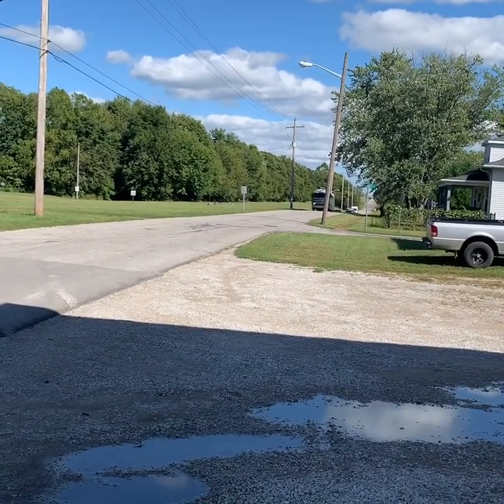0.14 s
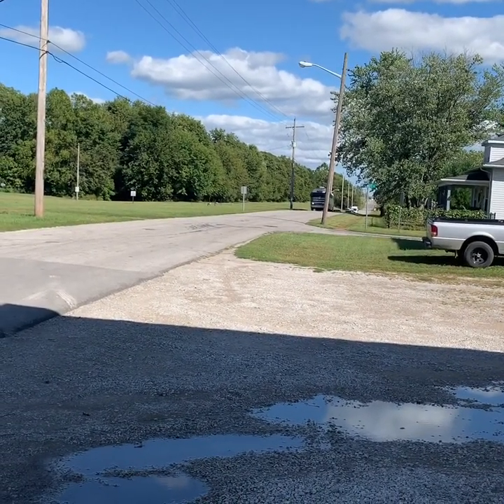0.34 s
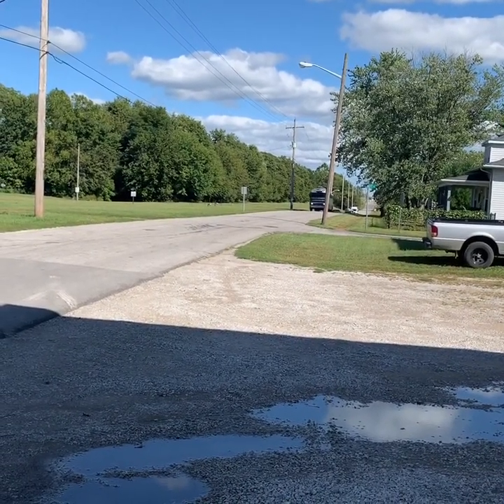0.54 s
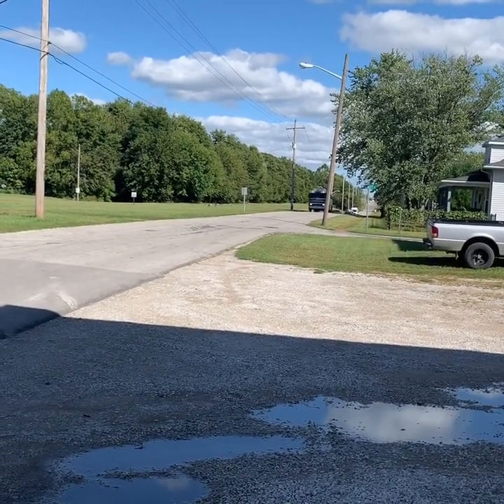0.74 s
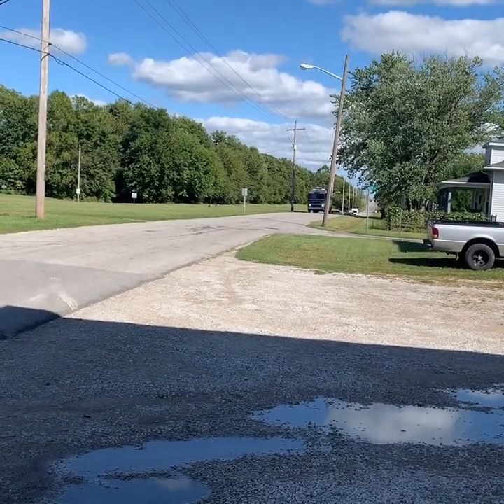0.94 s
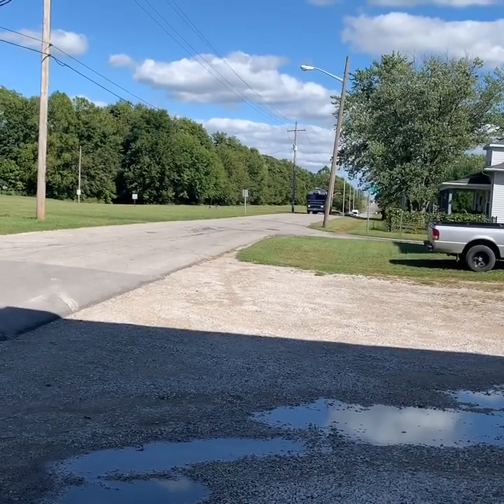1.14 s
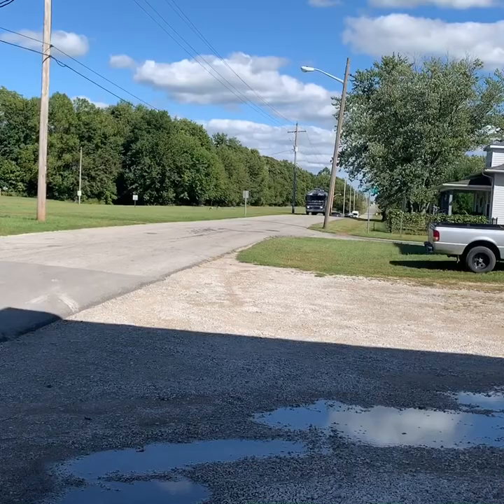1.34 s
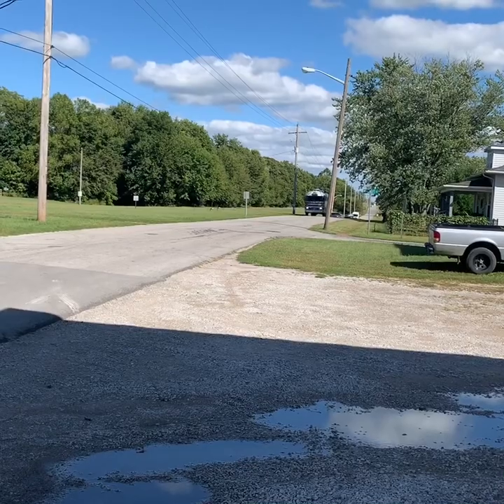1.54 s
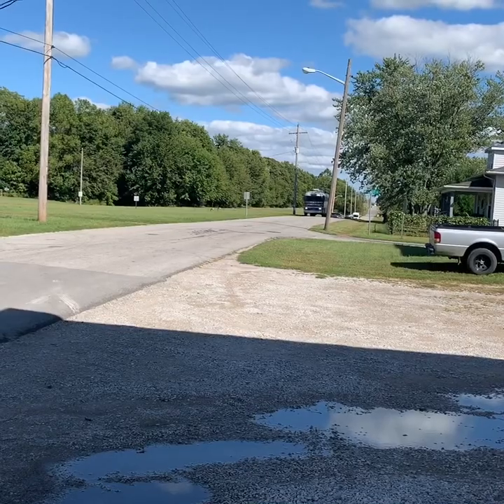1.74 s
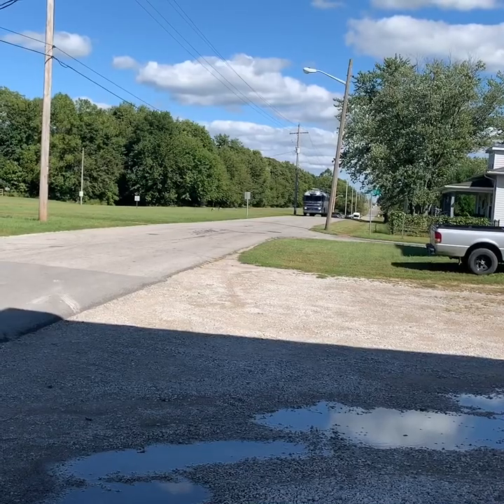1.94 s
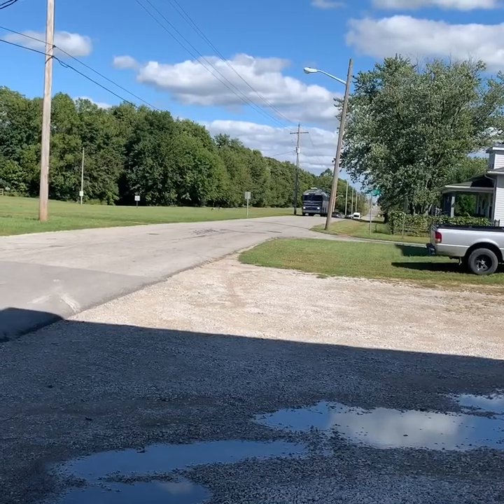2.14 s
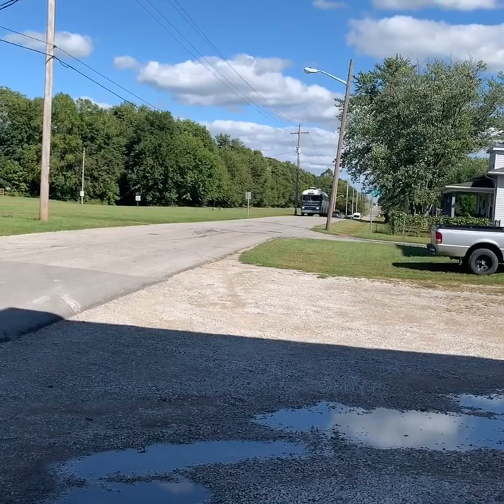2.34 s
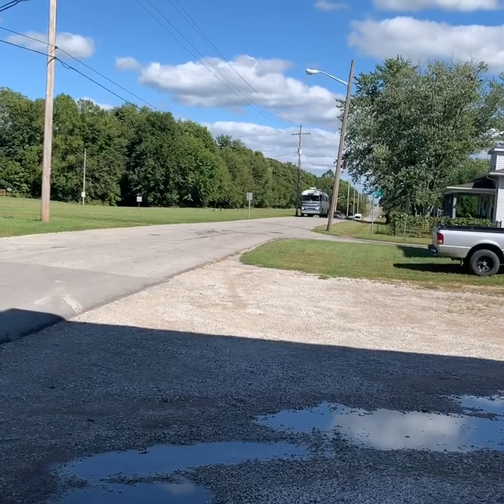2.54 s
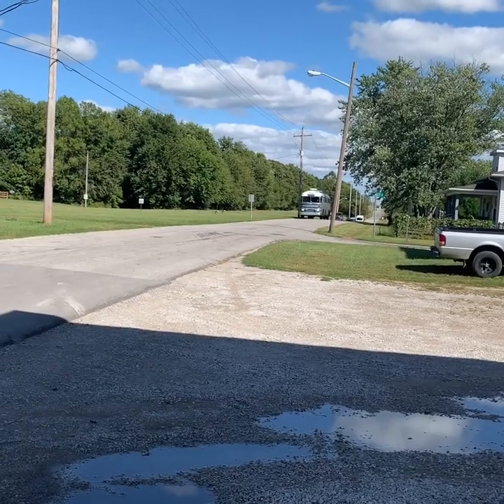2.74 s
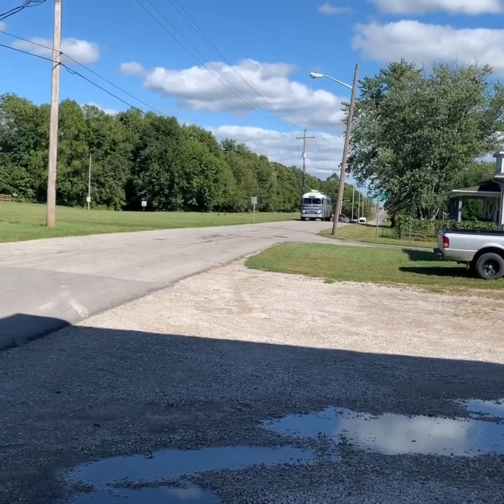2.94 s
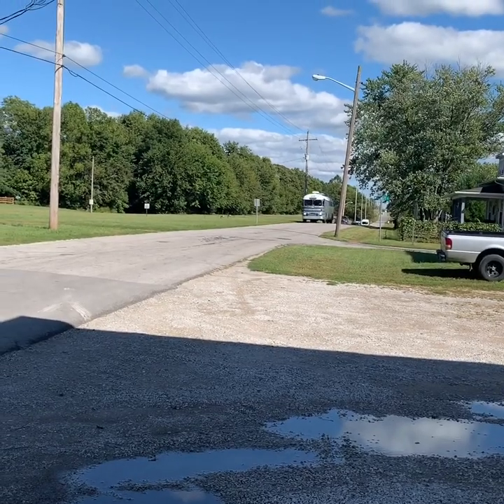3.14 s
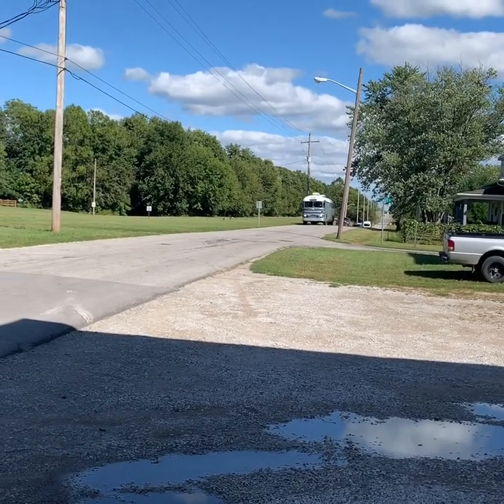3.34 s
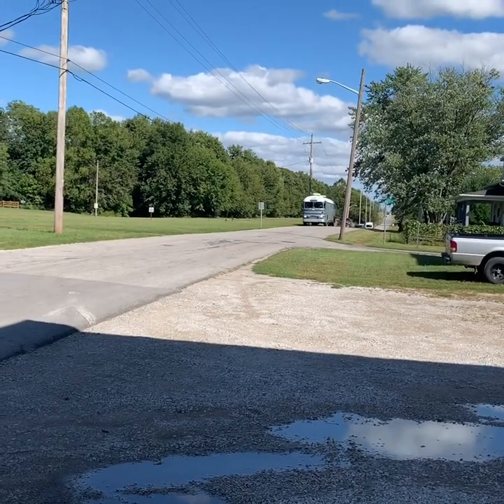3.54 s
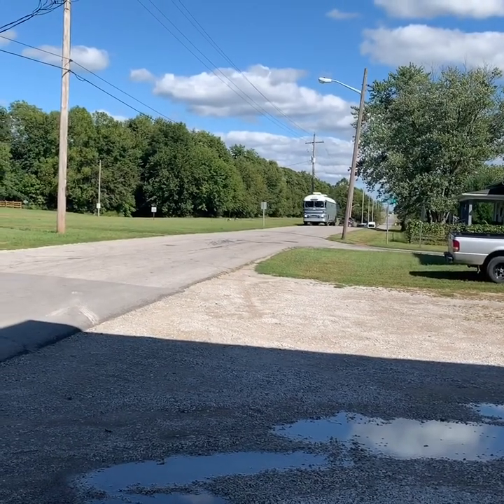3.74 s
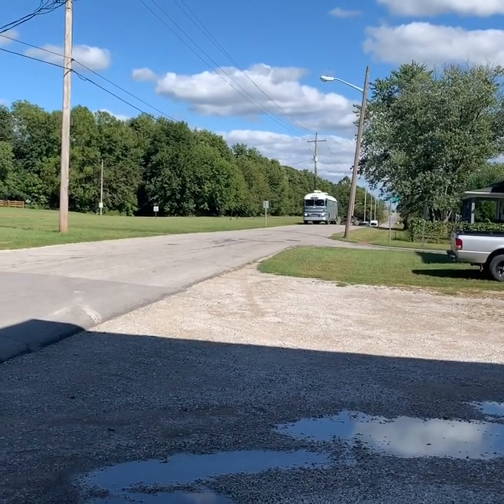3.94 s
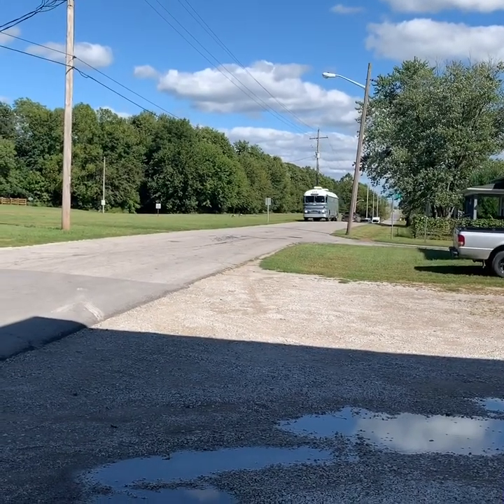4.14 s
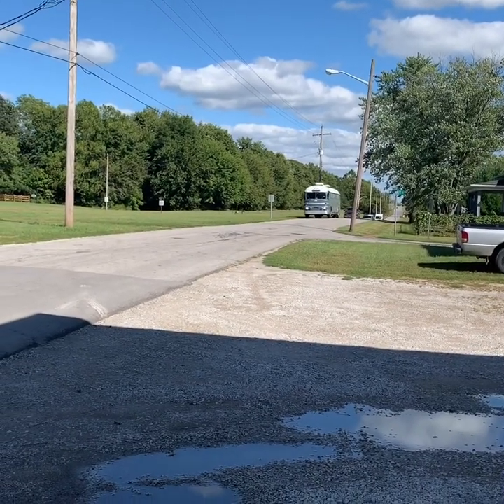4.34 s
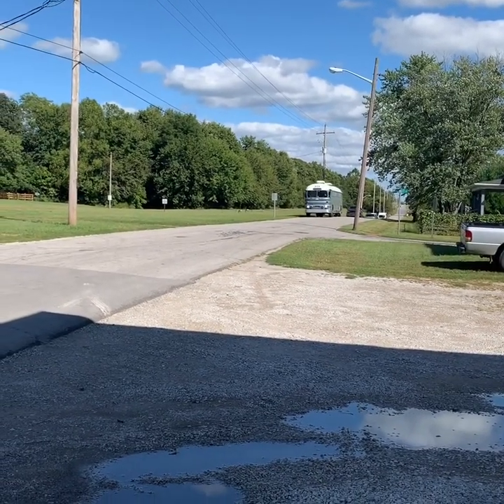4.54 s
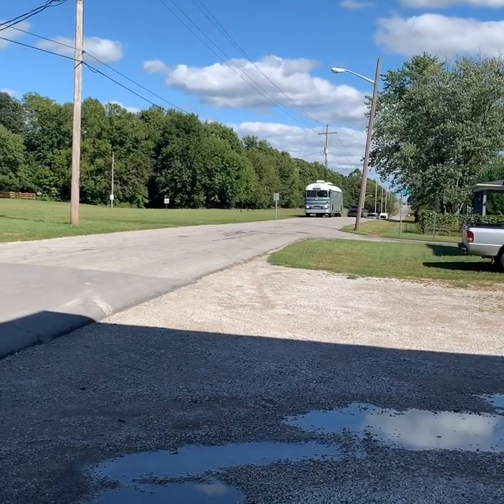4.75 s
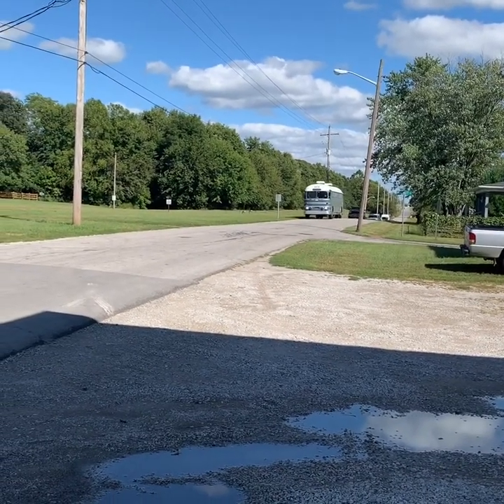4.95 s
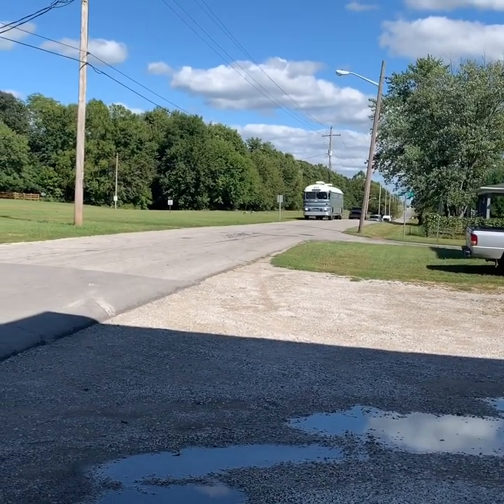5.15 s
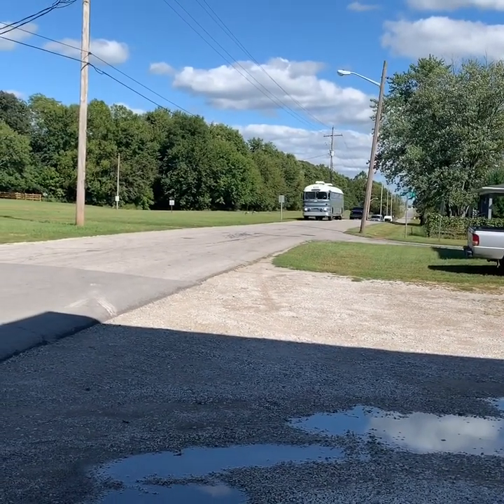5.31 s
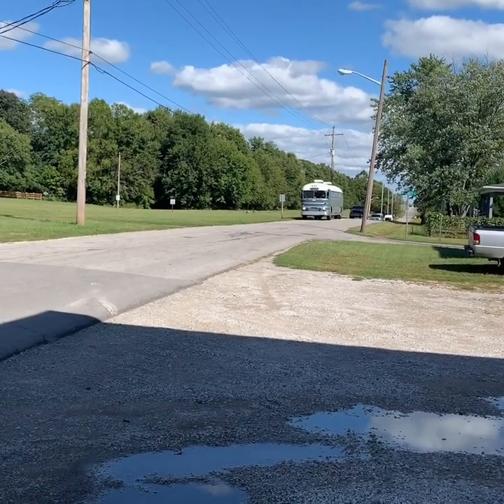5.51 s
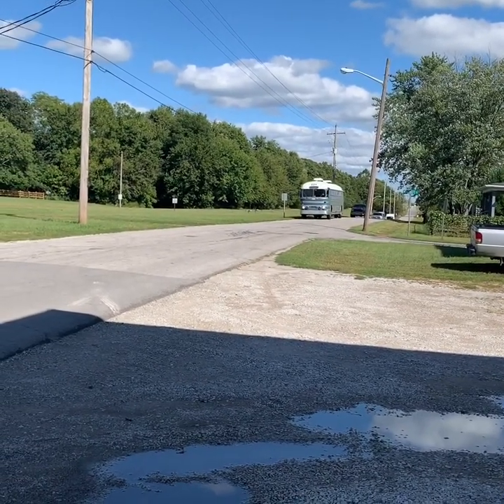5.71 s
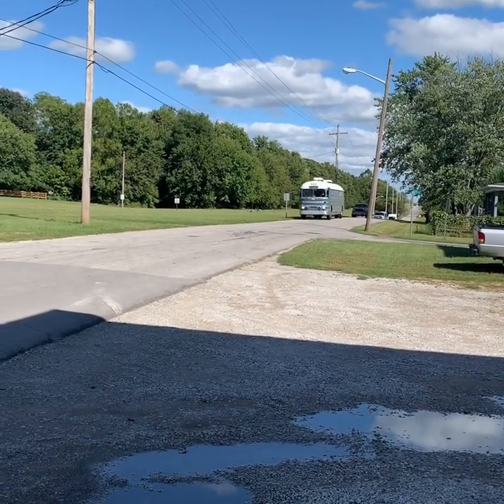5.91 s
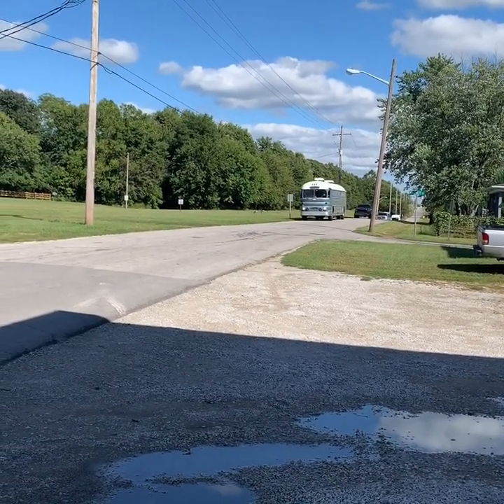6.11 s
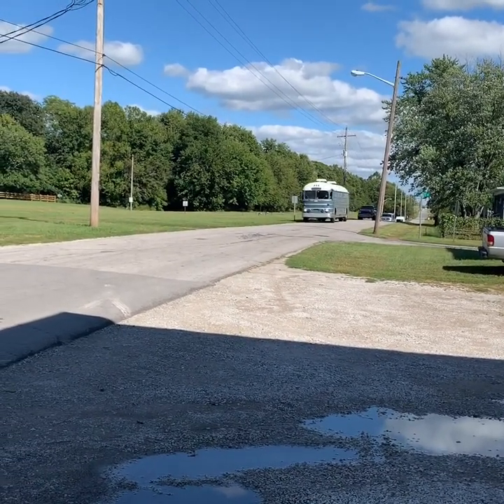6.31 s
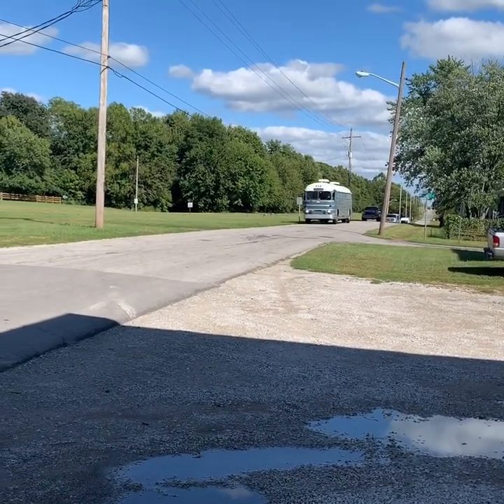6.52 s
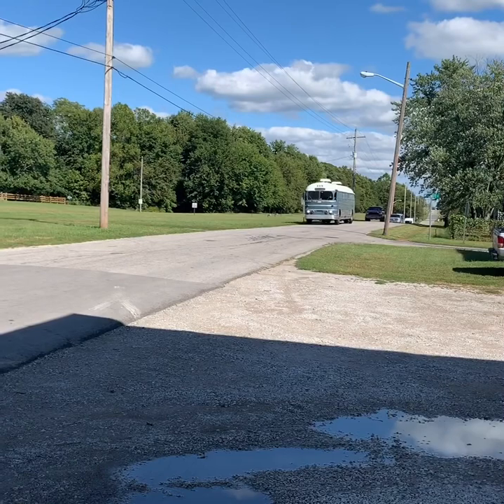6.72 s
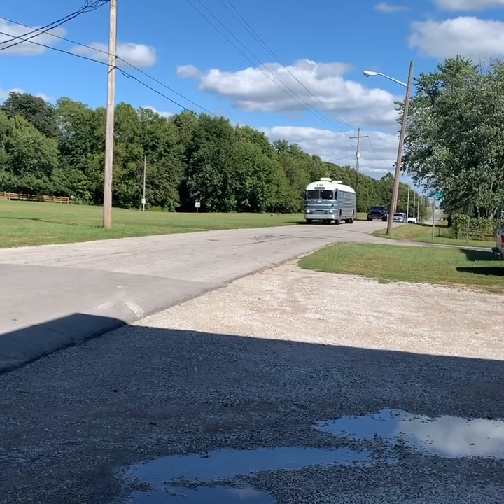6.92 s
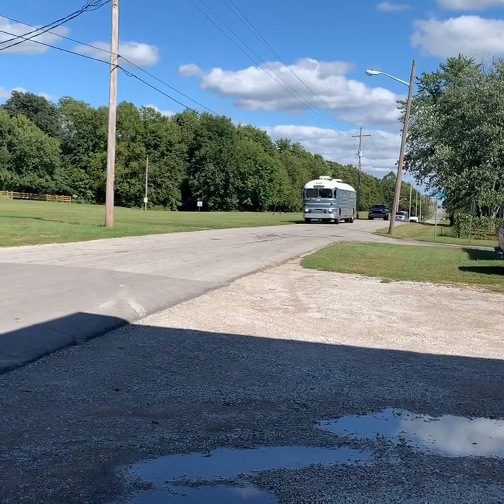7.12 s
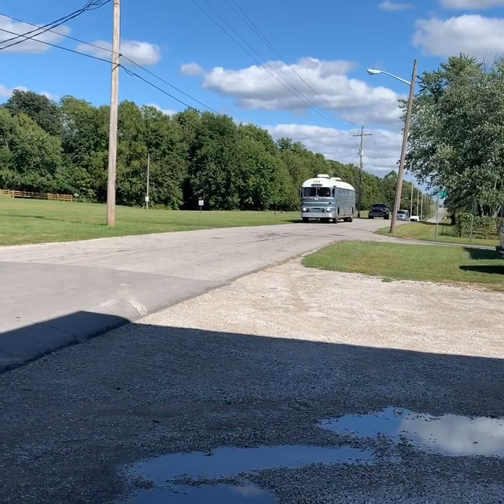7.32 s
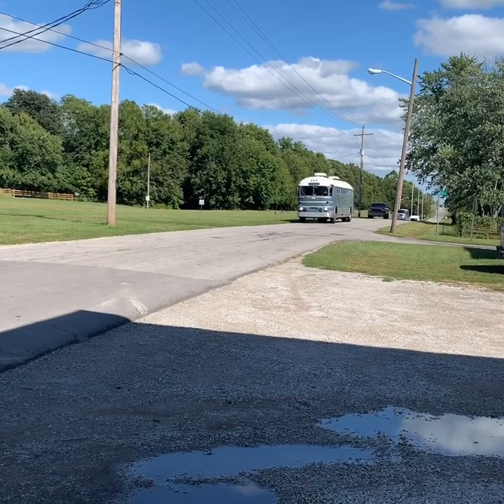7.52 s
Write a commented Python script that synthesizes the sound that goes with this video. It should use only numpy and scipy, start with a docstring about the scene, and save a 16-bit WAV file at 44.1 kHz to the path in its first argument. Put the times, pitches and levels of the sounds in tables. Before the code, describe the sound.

Outdoors by a country road, an old two-stroke diesel bus approaches with a throbbing, hollow exhaust drone that slowly drops in pitch as it coasts. Light breeze buffets the phone microphone, thin birds whistle early, and a few soft scuffs rub nearby. Near the end the driver blips the throttle: a harsh, loud bark with rushing gas echoes off trees, dips, and starts again.

```python
"""An old two-stroke diesel bus with an open exhaust coasts up a country road towards a phone, and slows. Close
by, the driver blips the throttle: firing pulses ring close reflections off a nearby building and echo off the
tree line. Shaft-locked harmonics make the exhaust drone, burble and roar; noise makes the gas rush and the
clatter. Behind it lie a light breeze and rustle of filtered noise, thin bird whistles of fluttering sines, and
a few soft, grainy scuffs of noise near the microphone."""
import sys
import numpy as np
from scipy import signal
from scipy.fft import rfft, irfft, next_fast_len
from scipy.io import wavfile
from scipy.ndimage import uniform_filter1d

SR = 44100
rng = np.random.default_rng(int(sys.argv[2]) if len(sys.argv) > 2 else 0)


def generate_wav(sig):
    """Save sig (samples, or channels by samples) to the path in sys.argv[1] as 16-bit PCM at SR."""
    pcm = np.round(np.clip(np.atleast_2d(sig).T, -1, 1) * 32767).astype(np.int16)
    wavfile.write(sys.argv[1], SR, pcm)


N = 338247
TIME = np.arange(N) / SR


def undb(db):
    """Decibels to gain."""
    return 10 ** (np.asarray(db) / 20)


def unit(x):
    """Scale to rms 1."""
    return x / np.sqrt(np.mean(x ** 2))


def curves(table):
    """Each column of a table after the first, joined by straight lines in time."""
    s, *columns = np.transpose(table)
    return [np.interp(TIME, s, column) for column in columns]


def gain_at(spectrum, hz):
    """Gain of a (pitch_hz, level_db) spectrum at the given frequencies, joined along log frequency."""
    points, db = np.transpose(spectrum)
    return undb(np.interp(np.log(hz + 1e-9), np.log(points), db))


def noise(spectrum):
    """White noise coloured by a spectrum, rms 1."""
    size = next_fast_len(N)
    white = rfft(rng.standard_normal(size))
    coloured = white * gain_at(spectrum, np.fft.rfftfreq(size, 1 / SR))
    return unit(irfft(coloured, size)[:N])


def walk(rate):
    """Smooth random drift of rms 1, changing about rate times a second."""
    slow = TIME[::64]
    steps = np.interp(slow * rate, np.arange(1024), rng.standard_normal(1024))
    smooth = uniform_filter1d(steps, int(1 / (slow[1] * rate * 2)))
    return np.interp(TIME, slow, unit(smooth))


def swell(middle, length):
    """A rounded rise, a hold and a fall; length is the width at half height."""
    return 1 / (1 + ((TIME - middle) / (length / 2)) ** 4)


def resonance(x, hz, width):
    """Two-pole band-pass, gain 1 at the centre."""
    return signal.lfilter(*signal.iirpeak(hz, hz / width, fs=SR), x)


# Tyres, leaves and open air, relative spectrum: pitch_hz, level_db (per Hz)
AIR = [(100, 12), (200, 14), (350, 3), (700, 6), (1000, -3.5), (1170, -1.5), (1600, -3), (1850, -7.5),
       (2300, -10.5), (3100, -19), (4500, -15), (7000, -21.5), (9500, -24), (12500, -31.5), (15500, -46)]
# How loud that rustle stands at the phone: time_s, level_db
RUSTLE = [(0, -44), (2.7, -43.5), (3.5, -42), (6.9, -41.5), (7.67, -35)]
# Breeze on the microphone, relative spectrum: pitch_hz, level_db (per Hz)
WIND = [(15, -9), (28, 3), (42, 7), (70, 9.5), (110, 4), (200, -20), (500, -69)]
# Gusts over the microphone: middle_s, length_s, gain_db (above the breeze)
GUSTS = [(0.306, 1.08, 4), (1.263, 0.16, 5), (2.107, 0.26, 8), (4.244, 0.65, 8), (5.81, 0.55, 4.5),
         (7.307, 0.52, 4)]
BREEZE_DB = -44.5  # between gusts, before buffeting


def outdoors(buffet_db=3.0):
    """Rustle of tyres and leaves, and a breeze that buffets the microphone, both filtered noise."""
    air = noise(AIR) * undb(curves(RUSTLE)[0])
    gusts_db = sum(db * swell(s, length) for s, length, db in GUSTS)
    wind = noise(WIND) * undb(BREEZE_DB + gusts_db + buffet_db * walk(8.3))
    return air + wind


# Thin whistles: peak_s, rise_s, fall_s, pitch_hz, level_db (at the peak, before flutter)
WHISTLES = [(.08, .06, 0.26, 7290, -61), (.1, .07, .07, 6740, -64), (.27, .12, 0.27, 8140, -62.5),
            (.46, .18, .2, 7590, -67.5), (.6, .08, 0.17, 8310, -68), (.79, 0.079, 0.047, 5300, -60.5),
            (.81, .07, 0.11, 7730, -62.5), (.88, 0.04, 0.033, 6720, -58), (1.75, 0.25, 0.45, 10980, -79),
            (2.0, .27, 0.68, 7520, -77), (4.69, 0.091, 0.15, 8300, -71), (4.92, 0.11, .1, 8230, -59.5),
            (5.12, .1, .17, 8240, -70)]


def birds(tremble=0.0022, flutter=0.72):
    """High, nearly level sine whistles that swell, tremble in pitch, flutter quickly in level and fade."""
    out = 0
    for s, rise_s, fall_s, hz, db in WHISTLES:
        phase = 2 * np.pi * np.cumsum(hz * (1 + tremble * walk(220))) / SR
        shape = np.exp(-((TIME - s) / np.where(TIME < s, rise_s, fall_s)) ** 2)
        flicker = 1 + flutter * np.tanh(walk(80))
        out = out + np.sqrt(2) * np.sin(phase) * shape * undb(db) * flicker
    return out


# Soft scuffs near the microphone: middle_s, length_s, body_level_db, hiss_level_db
SCUFFS = [(2.45, 0.12, -49.5, -60.5), (2.605, 0.1, -46.5, -57.5), (2.854, 0.061, -44, -52.5),
          (3.996, 0.041, -51, -60.5)]
# Relative spectra of their hollow body and bright hiss: pitch_hz, level_db (per Hz)
SCUFF_BODY = [(600, -35), (1150, -7.5), (1400, 3), (1650, -4), (2300, -16), (3200, -45)]
SCUFF_HISS = [(2000, -8), (3100, -6), (4000, 3.5), (5200, 1.5), (7300, -6), (10000, 0), (12000, -12),
              (15500, -31)]


def scuffs(grain_db=0.5):
    """Short rubs: noise with a hollow, grainy body and a bright hiss."""
    body = noise(SCUFF_BODY) * undb(grain_db * walk(90))
    hiss = noise(SCUFF_HISS)
    return sum(swell(s, length) * (undb(body_db) * body + undb(hiss_db) * hiss)
               for s, length, body_db, hiss_db in SCUFFS)


# Catches within the scuffs: middle_s, length_s, pitch_hz, level_db
RASPS = [(2.424, .0044, 1440, -45), (2.44, .0046, 1400, -42), (2.47, .018, 1420, -46),
         (2.566, 0.014, 1420, -40.5), (2.586, .011, 1370, -41), (2.614, 0.0063, 1450, -41.5),
         (2.643, .012, 1360, -39), (2.856, 0.024, 1530, -49.5), (2.887, 0.014, 1660, -44),
         (3.99, .012, 1360, -50)]


def rasps(width_hz=210):
    """Where a scuff catches, resonated noise gives a brief, hollow crunch with soft edges."""
    out = 0
    for s, length, hz, db in RASPS:
        grit = resonance(resonance(rng.standard_normal(N), hz, width_hz), hz, width_hz)
        shape = np.sqrt(swell(s, length))
        loudness = np.sqrt(np.average(grit ** 2, weights=shape ** 2))
        out = out + undb(db) * shape * grit / loudness
    return out


# Throttle blips close by: start_s, length_s, pedal (0 to 1)
BLIPS = [(7.07, .366, 1), (7.635, .3, .5)]
FUEL_ATTACK_S, FUEL_RELEASE_S = .045, .016


def throttle(release_s, attack_s=FUEL_ATTACK_S, linger_s=0):
    """Each blip rises quickly, holds and dies away: 0 coasting, 1 at full fuel."""
    out = 0
    for start, length, pedal in BLIPS:
        rise = np.clip((TIME - start) / attack_s, 0, 1)
        fall = np.exp(-np.maximum(TIME - start - length - linger_s, 0) / release_s)
        out = out + pedal * rise * fall
    return out


REV_UP_HZ_PER_S, SAG_HZ_PER_S = 28.6, 4.4  # gain at full fuel before friction; loss to friction


def revving(fuel):
    """Shaft speed relative to coasting, in Hz: fuel spins the engine up and friction drags it back."""
    friction = SAG_HZ_PER_S * (TIME > BLIPS[0][0])
    return np.cumsum(REV_UP_HZ_PER_S * fuel - friction) / SR


# Shaft of the coasting bus: time_s, turns_per_second_hz
COASTING = [(0, 31.12), (.7, 29.46), (1.1, 28.55), (2, 27.24), (2.9, 25.87), (3.8, 24.39), (4.7, 23.01),
            (5.6, 21.83), (6.15, 21.2), (6.33, 21.17), (6.6, 20.62), (6.8, 20.62), (6.93, 19.9),
            (7.02, 18.95), (7.1, 19.55)]


def shaft_speed(revs):
    """Turns per second: the slowing coast plus the throttle's revs, slightly unsteady."""
    return (curves(COASTING)[0] + revs) * (1 + .001 * walk(10))


# Shaft speeds between which the top-rev balance sets in: low_hz, high_hz
TOP_REVS_HZ = (26.9, 29.34)


def top_revs(speed):
    """0 at ordinary shaft speeds, 1 at the highest."""
    return np.interp(speed, TOP_REVS_HZ, [0, 1])


def effort(revs, fuel_db, overrun_db, drive, build_db=4):
    """Gain of a sound that follows the throttle, builds with the revs and lingers while they stay raised."""
    raised = np.maximum(revs, 0) / revs.max()
    return undb(fuel_db + build_db * (raised - .5)) * drive + undb(overrun_db) * raised


TRAIL_TURNS = .18  # sets how far each harmonic trails the one below


def harmonic(order, turns, wobble=0, trail=TRAIL_TURNS):
    """A multiple of the shaft speed, rms 1; the less each trails the one below, the deeper the throb."""
    return np.sqrt(2) * np.sin(2 * np.pi * order * (turns - trail * order) + wobble)


# Burble and clatter rise and dip as the bus nears the phone: time_s, level_db
NEARING = [(0, -64.5), (1, -62.5), (2, -59), (3.1, -60), (4.2, -62), (5, -59), (6, -55), (6.6, -56),
           (7.05, -60), (7.67, -55)]
BURBLE_FUEL_DB = -18  # gives way to the bark at full fuel


def approach(fuel):
    """Gain of the coasting engine's weaker sounds along the road, ducked under fuel."""
    return undb(curves(NEARING)[0] + BURBLE_FUEL_DB * fuel)


def clatter(turns, coasting, loaded, count=700, low_hz=800, high_hz=2100, coasting_db=-1, loaded_db=-7):
    """Injectors and valves rattle through the same noise pattern on every turn, harder under fuel."""
    pattern = rng.standard_normal(count)
    rattle = np.interp(turns * count, np.arange(count), pattern, period=count)
    band = signal.butter(3, [low_hz, high_hz], "band", fs=SR, output="sos")
    rattle = signal.sosfilt(band, rattle)
    return unit(rattle) * (coasting * undb(coasting_db) + loaded * undb(loaded_db))


# The blower's hum along the road: time_s, level_db (of its fundamental, before waver)
BLOWER = [(0, -57), (.9, -54), (1.8, -48), (3.3, -48.5), (4.7, -51.5), (6.2, -50.5), (7.67, -39)]
BLOWER_ORDER = 7.75  # multiple of the shaft speed, not whole


def blower(turns, ratio=BLOWER_ORDER, waver_db=1.5, octave_db=-19):
    """A geared blower hums between the engine's harmonics and beats against them."""
    phase = 2 * np.pi * ratio * turns
    hum = np.sqrt(2) * (np.sin(phase) + undb(octave_db) * np.sin(2 * phase))
    return hum * undb(curves(BLOWER)[0] + waver_db * walk(8))


LEAD_ORDER = 9  # multiple of the shaft speed
# The leading exhaust tone while coasting: time_s, level_db
LEAD = [(0, -49.5), (.4, -42.5), (1, -32.5), (2, -31), (2.4, -32.5), (3.1, -30), (5.2, -26.5), (6.6, -31),
        (7.67, -25.5)]
LEAD_FUEL_DB = 6.5  # louder at full fuel
# Exhaust tones below it, before the bass colour, by multiple of the shaft speed:
# far_level_db, near_level_db, top_revs_gain_db, fuel_gain_db
UNDERTONES = {3: (-37, -39, 3.5, 0), 6: (-65.5, -31.5, 2.5, 14), 7: (-46.5, -33.5, -15, 6.5),
              8: (-63, -59.5, 23.5, 3)}
# Bass colour that the undertones slide through: pitch_hz, gain_db
BASS = [(60, -2), (70, 3.5), (77, 0), (83, -8.5), (94, -1), (146, 1.5), (170, -2.5), (188, 3), (215, 9.5),
        (240, -1)]


def drone(speed, turns, fuel, revs, build_db=5, waver_db=0.6, undertone_waver_db=2.4):
    """The strongest exhaust harmonics, locked to the shaft; distance, revs and fuel set their balance."""
    near = TIME / TIME[-1]
    racing = top_revs(speed)
    build = build_db * (revs / revs.max() - .5)  # under fuel the low tones build with the revs
    lead_db = curves(LEAD)[0] + LEAD_FUEL_DB * fuel + waver_db * walk(14)
    out = harmonic(LEAD_ORDER, turns) * undb(lead_db)
    for order, (far_db, near_db, revs_db, fuel_db) in UNDERTONES.items():
        db = far_db + near * (near_db - far_db) + revs_db * racing
        db = db + (fuel_db + build) * fuel + undertone_waver_db * walk(15)
        # the tone next to the lead keeps in step with it, so the two throb once a turn
        in_step = 4 * np.pi * TRAIL_TURNS * (order == LEAD_ORDER - 1)
        out = out + harmonic(order, turns, in_step) * gain_at(BASS, order * speed) * undb(db)
    return out


# Unequal cylinders make these tones stand out, by multiple of the shaft speed:
# far_level_db, near_level_db (within the burble)
BURBLE = {4: (4, 1), 5: (2, 8), 10: (9.5, 11), 11: (-4, 9), 12: (-3, 3.5), 13: (-9, -5), 14: (-12, -2),
          15: (-9, -1.5), 16: (-9, -4), 17: (-6, -1), 18: (-3, -7), 19: (-7, -5), 20: (0, -2),
          21: (13.5, 4), 22: (0, 3), 23: (-5, -3.5), 24: (-2.5, 2), 27: (-6, -1.5), 28: (-2, -.5),
          30: (-9, -2.5), 32: (-10, 1), 33: (-12, -1), 35: (-10, -1), 37: (-9, -1), 38: (-11, -5)}
# Colour of the pipe, heard over the road: pitch_hz, gain_db
PIPE = [(90, -1), (170, 6), (205, 2), (235, 4), (262, 7), (292, 6), (325, -1), (365, 3.5), (398, -8.5),
        (445, 7.5), (480, 2), (535, 4.5), (575, -4.5), (615, 3), (650, -3.5), (690, 2), (745, -6), (820, 0),
        (900, -11), (1100, -22)]
# Single tones flare up or drop out for a while as the bus moves:
# order (multiple of the shaft speed), middle_s, length_s, gain_db
FLARES = [(10, 3.4, 0.36, -14), (11, 6.06, 0.22, 0), (12, 6.9, 2.5, 8.5), (21, 2.15, 2.6, 0),
          (28, 4.3, 2.4, 5), (27, 5.04, 1.7, 11), (31, 13, 0.9, 9), (17, 5.75, 1.2, 7), (24, 5.7, 1, 4),
          (32, 6.4, 1.8, 4), (33, 6.2, 0.76, 8.5), (30, 6.9, 1, 0.5), (34, 6.8, 0.49, 12.5),
          (21, 9.6, 0.45, 10)]
# the remaining tones share one level, which rises with the multiple
REST_FAR_DB, REST_NEAR_DB, REST_DB_PER_ORDER = -12.5, -9, 0.0243
# at top revs the burble leans to the bass, tilting about this multiple
REVS_TILT_DB_PER_ORDER, REVS_PIVOT = -1, 12.8
UPPER_TRAIL_TURNS = .04  # the upper tones keep closer together, pulsing once a turn
WAVER_RAD = .2  # rms phase waver of the upper tones


def burble(speed, turns, fade_db=1.5, far_s=3.3, near_s=4.88):
    """Weaker harmonics slide through the pipe's resonances; moving air makes each fade and waver."""
    near = np.interp(TIME, [far_s, near_s], [0, 1])
    tilt_db = REVS_TILT_DB_PER_ORDER * top_revs(speed)
    out = 0
    for order in range(3, 39):
        if order == LEAD_ORDER or order in UNDERTONES:
            continue
        rise_db = REST_DB_PER_ORDER * order
        far_db, near_db = BURBLE.get(order, (REST_FAR_DB + rise_db, REST_NEAR_DB + rise_db))
        unsteady = min(order / REVS_PIVOT, 1)  # the low tones hold steadier
        trail = UPPER_TRAIL_TURNS if order > REVS_PIVOT else TRAIL_TURNS
        tone = harmonic(order, turns, unsteady * WAVER_RAD * walk(16), trail)
        db = far_db + near * (near_db - far_db) + tilt_db * (order - REVS_PIVOT)
        db = db + unsteady * fade_db * walk(4.6)
        db = db + sum(flare_db * swell(s, length) for k, s, length, flare_db in FLARES if k == order)
        out = out + tone * gain_at(PIPE, order * speed) * undb(db)
    return out


# Rush of exhaust gas, relative spectrum: pitch_hz, level_db (per Hz)
GAS = [(150, 3.5), (500, 8), (800, 11.5), (1000, -30), (1200, 9.5), (1700, -21), (2300, 1), (3050, -12),
       (4000, -4), (4800, -1.5), (7000, -7.5), (9300, -7), (12000, -22), (15500, -48)]
# level under fuel at middling revs, level left while the engine runs down, time to die back
GAS_DB, GAS_OVERRUN_DB, GAS_RELEASE_S = -38.5, -69, 0.018
GAS_ATTACK_S, GAS_LINGER_S = 0.039, 0.029  # starts sharply and outlasts the fuel


def gas(turns, puff_db=1.5):
    """Gas tears out of the pipe as noise in puffs, three to a turn."""
    puffs = np.cos(3 * 2 * np.pi * turns)
    flicker_db = .9 * walk(70)
    return unit(noise(GAS) * undb(puff_db * puffs + flicker_db))


# Harmonics that stand out at full fuel, before the colour: multiple of the shaft speed: level_db
ROAR = {5: -43, 8: -47, 11: -33, 12: -27, 14: -41, 15: -38, 17: -43, 18: -43, 21: -39, 24: -38, 27: -35, 30:
        -40, 33: -40, 35: -43, 39: -41}
# Their colour: pitch_hz, gain_db
ROAR_PIPE = [(265, 3), (300, -15), (335, -12), (360, -1), (392, 3.5), (410, -10), (432, 3), (455, -7),
             (505, -8), (530, 3), (620, -7), (680, 2.5), (745, -2), (810, 3), (880, 0), (950, -32)]


def roar(speed, turns, fade_db=1.0):
    """Firing harmonics climb through the pipe's resonances with the revs, each a little ragged."""
    out = 0
    for order, db in ROAR.items():
        tone = harmonic(order, turns, WAVER_RAD * walk(60))
        out = out + tone * gain_at(ROAR_PIPE, order * speed) * undb(db + fade_db * walk(25))
    return out


# Narrow, closely spaced peaks from reflections off a building near the phone, rung by hard firings: pitch_hz,
# width_hz (of each of two passes), gain_db
BARK = [(263, 40, 8.5), (354, 16, 6), (388.7, 17, 6.5), (432, 22, 2.5), (530, 59, 4), (569, 36, 3),
        (611, 31, 1.5), (673, 45, 6), (710, 31, 5), (775, 20, 4.5), (807, 28, 3.5), (860, 56, -2.5),
        (995, 44, -7.5), (1114, 39, -7), (1158, 22, -5), (1204, 21, -2), (1306, 29, -6), (1380, 340, -14.5),
        (1670, 170, -14), (2120, 330, -19)]
# level under fuel at middling revs, level left while the engine runs down, time to die back
BARK_DB, BARK_OVERRUN_DB, BARK_RELEASE_S = -26, -41, 0.043


def bark(turns, count=6, weak_db=-5, jitter_s=0.00038, uneven_db=1.5, spread_s=0.00587, turbulence_db=-2):
    """Six firings a turn, strong and weak by turns, ring a set of narrow, closely spaced peaks."""
    at = np.flatnonzero(np.diff(np.floor(count * turns)))
    chance = rng.uniform(-1, 1, (2048, 2))[:len(at)]
    firing = np.arange(len(at))
    at = np.clip(at + (jitter_s * SR * chance[:, 0]).astype(int), 0, N - 1)
    # each cylinder is also a little stronger or weaker than its neighbours
    cylinder_db = weak_db * (firing % 2) + uneven_db * np.cos(2 * np.pi * firing / count)
    scatter_db = 3 * chance[:, 1]
    pulses = np.zeros(N)
    pulses[at] = undb(cylinder_db + scatter_db)
    # a turbulent blow-down follows each firing and decays until the next
    blow_down = rng.standard_normal(N) * np.exp(-2 * (count * turns % 1))
    push = unit(pulses) + undb(turbulence_db) * unit(blow_down)
    # each peak arrives by its own short path, a little late
    rung = 0
    for hz, width, db in BARK:
        ring = resonance(resonance(push, hz, width), hz, width)
        delay = int(spread_s * SR * rng.random())
        rung = rung + undb(db) * np.roll(ring, delay)
    band = signal.butter(6, [225, 2400], "band", fs=SR, output="sos")
    return unit(signal.sosfilt(band, rung))


def tree_line(x, wet_db, t60=1.0, delay_s=0.08):
    """A thin, dull echo scattered back by trees and house fronts: a delayed, decaying noise tail."""
    t = TIME[:SR]
    tail = rng.standard_normal(SR) * undb(-60 * t / t60) * (t > delay_s)
    dull = signal.butter(3, 6500, fs=SR, output="sos")
    tail = signal.sosfilt(dull, tail / np.sqrt(np.sum(tail ** 2)))
    return undb(wet_db) * signal.fftconvolve(x, tail)[:N]


def scene():
    """The throttle and one shaft drive every engine layer; the surroundings go on around it."""
    fuel = throttle(FUEL_RELEASE_S)
    revs = revving(fuel)
    speed = shaft_speed(revs)
    turns = np.cumsum(speed) / SR
    coasting = approach(fuel)
    gas_drive = throttle(GAS_RELEASE_S, GAS_ATTACK_S, GAS_LINGER_S)
    rush = effort(revs, GAS_DB, GAS_OVERRUN_DB, gas_drive)
    hiss = gas(turns) * rush
    barking = bark(turns) * effort(revs, BARK_DB, BARK_OVERRUN_DB, throttle(BARK_RELEASE_S))
    blip = barking + roar(speed, turns) * fuel
    engine = drone(speed, turns, fuel, revs) + blower(turns) + burble(speed, turns) * coasting
    echoes = tree_line(blip, wet_db=-10.5) + tree_line(hiss, wet_db=-6.5) + tree_line(engine, wet_db=-25.5)
    bus = engine + clatter(turns, coasting, rush) + blip + hiss + echoes
    return (bus + outdoors() + scuffs() + rasps() + birds())[None]


def record(dry):
    """The phone cuts the top; the first and last few milliseconds open and close softly."""
    to_edge_s = np.minimum(TIME, TIME[-1] - TIME)
    edges = np.sin(np.pi / 2 * np.minimum(1, to_edge_s / .006)) ** 2
    top_cut = signal.ellip(10, .2, 80, 15650, fs=SR, output="sos")  # steep low-pass, edge in Hz
    return signal.sosfilt(top_cut, dry * edges)


dry = scene()
out = record(dry)
generate_wav(out)
```